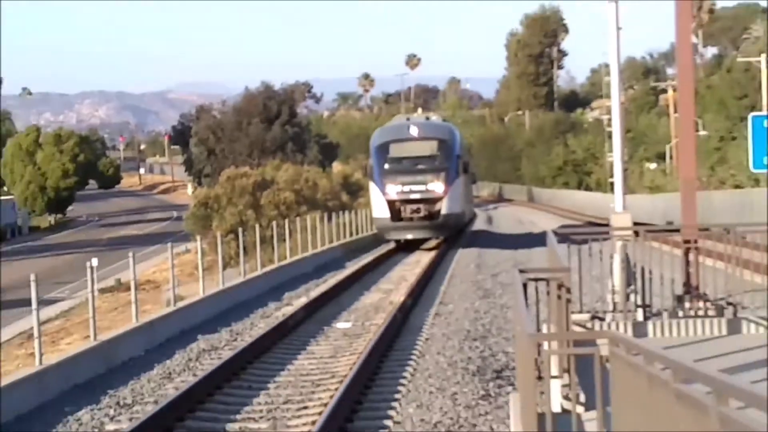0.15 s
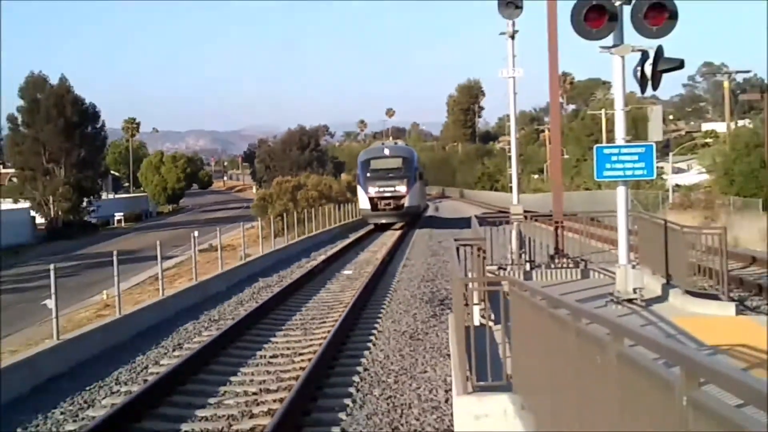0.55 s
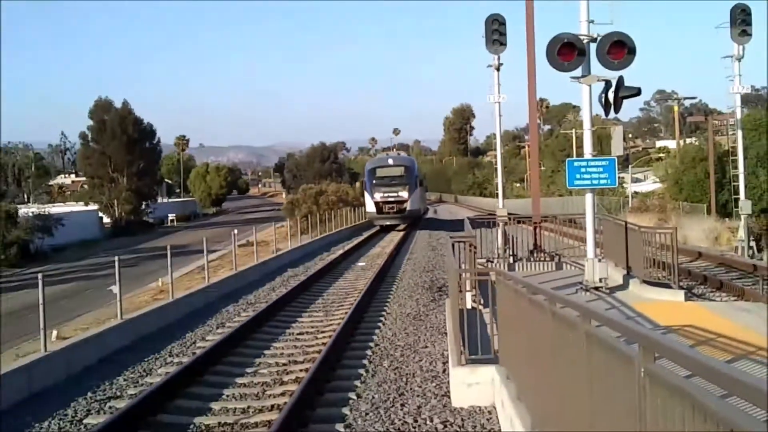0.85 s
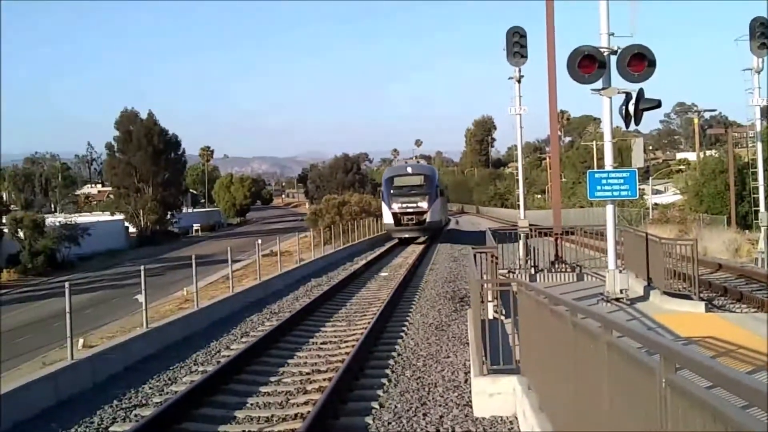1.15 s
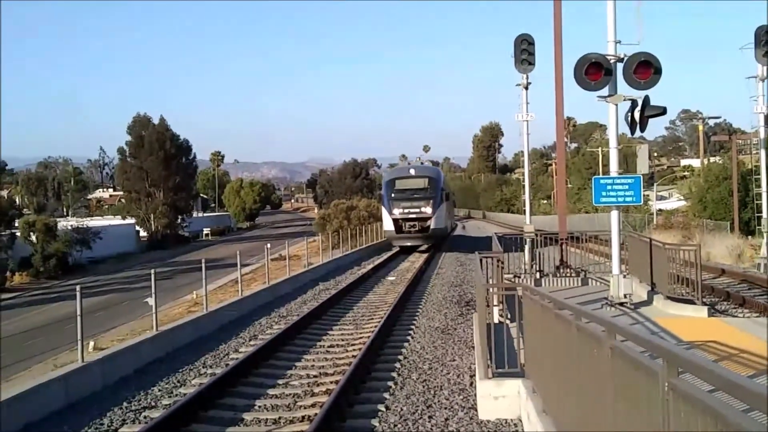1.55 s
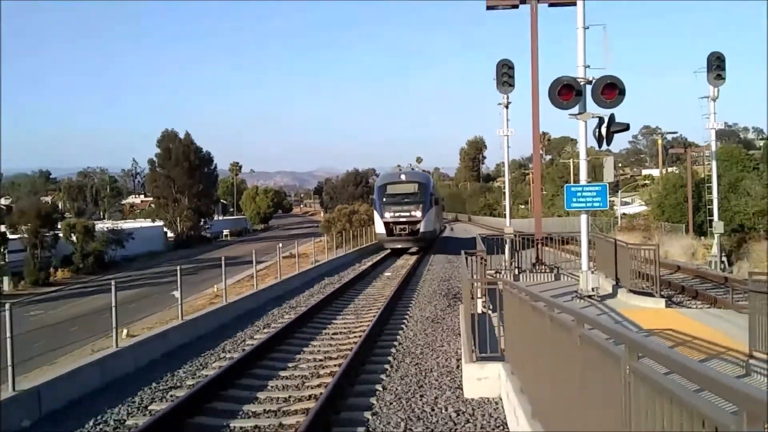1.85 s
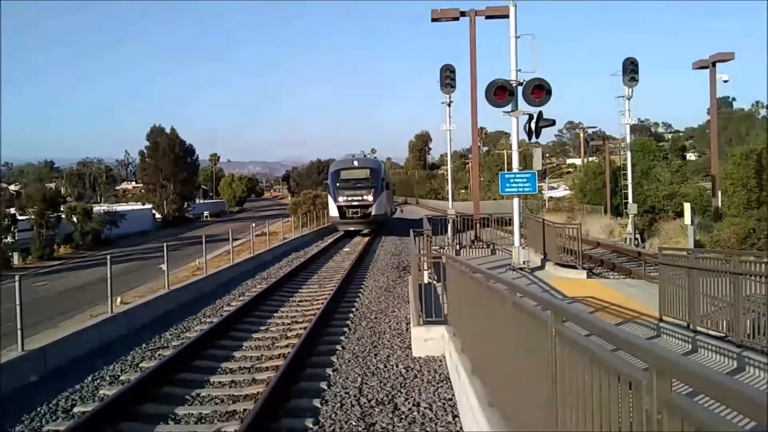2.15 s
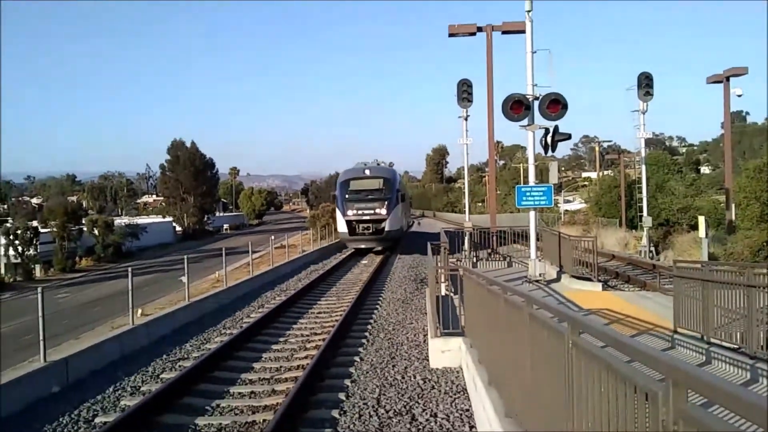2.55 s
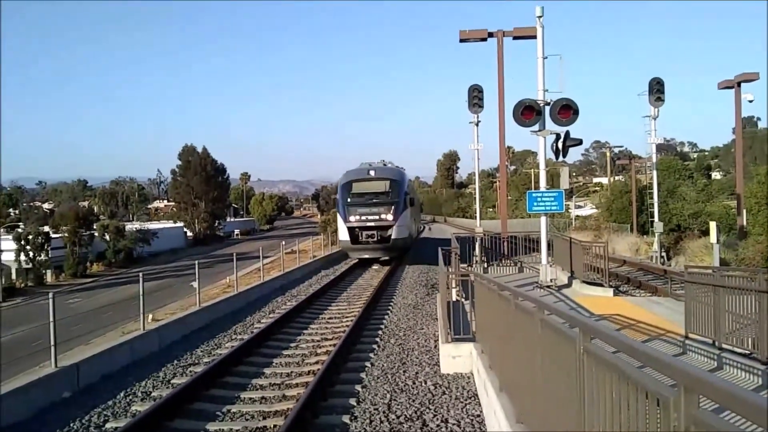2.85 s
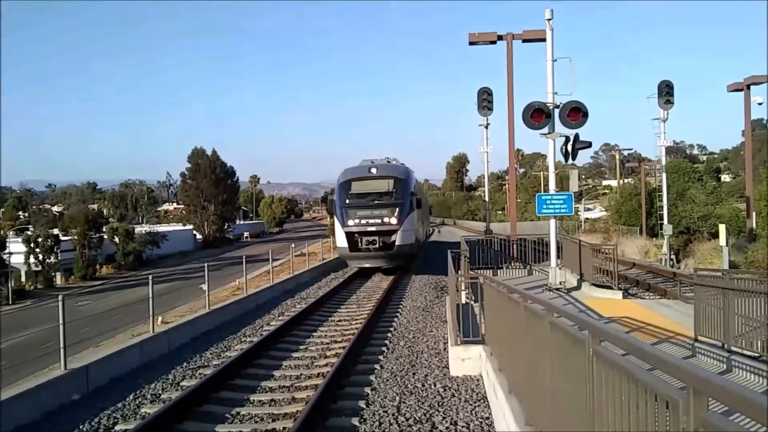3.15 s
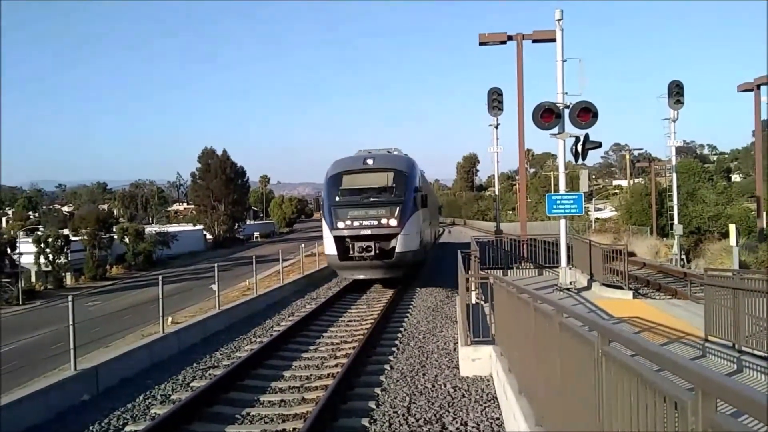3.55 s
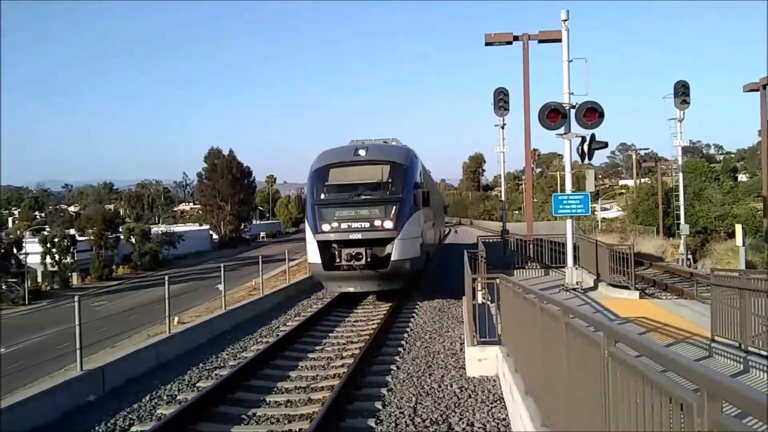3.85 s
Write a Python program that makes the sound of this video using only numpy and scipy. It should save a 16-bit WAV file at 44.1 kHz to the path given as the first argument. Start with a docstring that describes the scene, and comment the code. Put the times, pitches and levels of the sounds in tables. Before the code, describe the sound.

A train horn blows twice as a diesel railcar approaches, with wind buffeting the microphone.

```python
"""A diesel railcar rolls up to a platform crossing and blows its one-note air horn twice.
Its engine drones, air puffs, the wheels knock over rail joints, then the horn's diaphragm sounds,
brighter as the pressure rises. Heard from the crossing, with the town behind, on a handheld recorder:
wind buffets its two microphone ports, and its widener subtracts a delayed copy of each side from the
other."""
import sys
import numpy as np
from scipy import signal
from scipy.fft import rfft, irfft, next_fast_len
from scipy.io import wavfile
from scipy.ndimage import uniform_filter1d, minimum_filter1d

SR = 44100
rng = np.random.default_rng(int(sys.argv[2]) if len(sys.argv) > 2 else 0)


def output_pcm(signal):
    """Save a mono or channel-first signal as 16-bit PCM at the path in sys.argv[1].

    Samples are clipped to [-1, 1] before scaling.
    """
    pcm = np.clip(np.atleast_2d(signal).T, -1, 1) * 32767
    wavfile.write(sys.argv[1], SR, np.round(pcm).astype(np.int16))


N = 176400
TIME = np.arange(N) / SR


def amp(db):
    return 10 ** (np.asarray(db) / 20)


def unit_rms(x):
    return x / np.sqrt(np.mean(x ** 2) + 1e-20)


def in_time(rows):
    times, *columns = np.transpose(rows)
    return [np.interp(TIME, times, column) for column in columns]


def at_hz(rows, hz):
    freqs, values = np.transpose(rows)
    return np.interp(np.log(hz), np.log(freqs), values)


def lowpass(x, hz):
    return signal.sosfilt(signal.butter(1, hz, fs=SR, output="sos"), x)


def sides(pan_db):
    """Left and right gains; pan is left minus right."""
    return amp(np.array([pan_db / 2, -pan_db / 2])).reshape(2, -1)


def drift(hz):
    """Slow random wander, rms 1."""
    step = 40
    pole = np.exp(-2 * np.pi * hz * step / SR)
    slow = signal.lfilter([1], [1, -2 * pole, pole * pole], rng.standard_normal(N // step + 2002))[2000:]
    return np.interp(np.arange(N) / step, np.arange(len(slow)), unit_rms(slow))


def coloured(spectrum, likeness, flicker_db):
    """Stereo noise in octave bands that flicker on their own, the top ones less; rms 1."""
    hz = np.arange(N // 2 + 1) * SR / N + 1
    mid, side = rfft(rng.standard_normal((2, N)))
    alike = np.clip(at_hz(likeness, hz), -1, 1)
    white = np.sqrt(1 + alike) * mid + np.sqrt(1 - alike) * side * [[1], [-1]]
    shaped = white * amp(at_hz(spectrum, hz))
    octave = np.clip(np.log2(hz / 60), 0, 7)
    out = 0
    for k in range(8):
        band = irfft(shaped * np.clip(1 - abs(octave - k), 0, 1), N)
        out += amp(flicker_db * min(1, 2 - k / 4) * drift(12.5)) * band
    return unit_rms(out)


# The railcar drawing near the crossing: t/s, relative level/dB
ROLL_LEVEL = [(0, -60.5), (2.1, -63.5), (2.65, -57), (2.8, -47), (2.92, -42), (3.22, -41.5), (3.35, -44),
              (3.6, -44.5), (3.75, -39.5), (4, -42)]
# Its rolling noise: f/Hz, relative density/dB
ROLL_SPECTRUM = [(60, -39), (150, 9.5), (300, -2.5), (540, -8), (600, 6), (680, -3.5), (950, -15),
                 (1300, -25), (1750, -15), (2000, -11.5), (2200, -75), (2600, -13), (3300, -22.5),
                 (4300, -12.5), (5500, -19), (6500, -13), (7500, -21), (11000, -21.5), (14000, -37)]
# How alike the two ports hear railcar and town: f/Hz, correlation (-1..1)
PORT_LIKENESS = [(100, 1), (600, 0.63), (1500, -0.063), (2000, -0.78), (2600, -0.48), (3300, 0.57),
                 (5000, 0.011)]
RAILCAR_PAN_DB = -1


def rolling():
    """Wheels on rails, louder as they near; the left port is shaded from their treble."""
    noise = coloured(ROLL_SPECTRUM, PORT_LIKENESS, flicker_db=2.5)
    out = amp(8.5 + in_time(ROLL_LEVEL)[0]) * sides(RAILCAR_PAN_DB) * noise
    out[0] = lowpass(out[0], hz=9000)
    return out


# Background at the crossing: f/Hz, relative density/dB
TOWN_SPECTRUM = [(60, -75), (135, -57), (260, -62), (330, -60.5), (500, -76), (600, -60.5), (680, -71),
                 (950, -73.5), (1380, -73), (1750, -82.5), (2000, -72), (2200, -84), (3300, -89.5),
                 (4300, -92.5), (5250, -91.5), (5460, -78), (5700, -85.5), (6450, -88.5), (7500, -90.5),
                 (9000, -99), (11000, -101), (14000, -107)]


def town():
    """A steady wash of distant traffic and town, a little to the left."""
    return amp(-41.5) * sides(pan_db=5) * coloured(TOWN_SPECTRUM, PORT_LIKENESS, flicker_db=1.5)


# The diesel's drone: f/Hz, relative density/dB
ENGINE_SPECTRUM = [(80, -55.5), (99, -3.5), (107, -1), (117, -3), (150, -25.5), (195, -15.5), (211, -12),
                   (230, -21), (300, -39), (500, -88)]
# Its strength at the microphone: t/s, level/dB
ENGINE_LEVEL = [(0, -35.5), (1, -29), (1.6, -31.5), (2.5, -27), (3.1, -29.5), (4, -34)]


def engine():
    """Low diesel drone: noise in two humps an octave apart, the same at both ports."""
    return amp(in_time(ENGINE_LEVEL)[0]) * coloured(ENGINE_SPECTRUM, [(100, 1.0)], flicker_db=-1.0)


# Gusts right on the microphone: t/s, relative level/dB, pan/dB
PORT_GUSTS = [(0, -54.5, 21), (.21, -42, 6), (.35, -56, 0), (.55, -48.5, 12), (.65, -50.5, 16.5),
              (.95, -46.5, 14.5), (1.1, -51, 5), (1.4, -47, -1), (1.72, -42.5, 5), (1.9, -48, 2),
              (2.5, -46.5, 1), (2.75, -48, 9), (3.25, -40, -6), (3.4, -46, 1), (4, -57.5, -7.5)]
# Their rumble: f/Hz, relative density/dB
WIND_SPECTRUM = [(20, -9.5), (48, 1.5), (70, 7.5), (140, -0.5), (230, -9.5), (350, -17.5), (600, -28),
                 (1200, -84.5)]
# The deepest wind swells, then dies away: t/s, gain/dB
DEEP_SWELL = [(0.6, 0), (1.7, 5), (2.7, -3.5), (3.7, -9)]


def wind(lump_db=3.5, lump_hz=19.5):
    """Wind on the ports: lumpy low noise, mostly its own in each."""
    level_db, pan_db = in_time(PORT_GUSTS)
    lumps = amp(lump_db * np.array([drift(lump_hz), drift(lump_hz)]))
    noise = coloured(WIND_SPECTRUM, likeness=[(100, 0.2)], flicker_db=4.0)
    rumble = amp(18 + level_db) * sides(pan_db) * unit_rms(lumps * noise)
    deep = lowpass(rumble, hz=65)
    return rumble - deep + deep * amp(in_time(DEEP_SWELL)[0])


# Hard buffets on the ports: t/s, relative level/dB, f/Hz (higher is shorter)
PORT_BUFFETS = [(0.553, -8, 126), (0.743, -12.5, 140), (0.8, -10.5, 240), (.841, -8, 130),
                (0.856, -8.5, 207), (.899, -9, 263), (.905, -4.5, 300), (.913, -9, 300), (0.973, -3.5, 255),
                (.986, -7.5, 147), (1.482, -15.5, 138), (2.117, -13, 110), (2.278, -11, 175),
                (2.435, -13, 255), (2.519, -11, 230), (2.544, -15.5, 200)]


def buffets(width_cycles=0.48, edge_s=0.0008, lopsided=0.53, lee_db=-51):
    """Single pressure jolts, a push then a deeper dip, on the port that the gust favours."""
    _, pan_db = in_time(PORT_GUSTS)
    out = np.zeros((2, N))
    for at, db, hz in PORT_BUFFETS:
        cycles = (TIME - at) * hz
        pulse = np.exp(-(cycles / width_cycles) ** 2) * np.cos(np.pi * cycles)
        edge = np.tanh((TIME - at) / edge_s) + lopsided
        port_db = [[0], [lee_db]] if pan_db[int(at * SR)] > 0 else [[lee_db], [0]]
        out -= amp(db) * pulse * edge * amp(port_db)
    return out


# Faint puffs of air: t/s, length/s, level/dB
AIR_PUFFS = [(1.19, 0.022, -58), (2.255, 0.043, -49.5), (2.321, 0.078, -46.5), (2.416, 0.11, -52.5),
             (2.868, 0.023, -41)]


def puffs(band_hz=(3360, 8900)):
    """Air hissing in short, smooth humps."""
    humps = sum(amp(db) * np.exp(-(2 * (TIME - at) / length - 1) ** 2) for at, length, db in AIR_PUFFS)
    band = signal.butter(2, band_hz, "band", fs=SR, output="sos")
    return humps * unit_rms(signal.sosfilt(band, rng.standard_normal((2, N))))


# Ring of rail and car body: f/Hz, t60/s
RAIL_MODES = [(212, .12), (600, .05), (760, .04), (985, .02), (1290, .05)]
# Wheels meeting joints as the railcar comes close: t/s, level/dB, favoured f/Hz
JOINT_KNOCKS = [(2.408, -21.5, 212), (2.685, -28.5, 212), (2.822, -33.5, 600), (2.872, -38.5, 760),
                (2.891, -28.5, 985), (2.94, -38, 1290), (2.978, -26.5, 600), (2.999, -26.5, 600),
                (3.02, -29, 670), (3.059, -21, 860), (3.075, -31.5, 600), (3.119, -24, 637),
                (3.148, -31.5, 590), (3.18, -26.5, 647), (3.2, -40, 617)]


def wheel_knocks(loss_db_per_octave=51):
    """Soft blows at the joints: the modes near each blow's favoured pitch swell, then die."""
    times, db, favoured_hz = np.transpose(JOINT_KNOCKS)
    out = np.zeros(N)
    for hz, t60 in RAIL_MODES:
        strength = amp(db - loss_db_per_octave * abs(np.log2(hz / favoured_hz)))
        blows = np.zeros(N)
        blows[(times * SR).astype(int)] = strength * rng.choice([-1, 1], len(times))
        decay, angle = amp(-60 / (t60 * SR)), 2 * np.pi * hz / SR
        poles = [1, -2 * decay * np.cos(angle), decay * decay]
        ring = signal.lfilter([0, np.sin(angle)], poles, blows + 1e-18)
        # a second pass through the mode softens the attack
        out += signal.lfilter([0, 2 * np.e * (1 - decay) * np.sin(angle)], poles, ring)
    return out * sides(RAILCAR_PAN_DB)


# Two horn blasts at the crossing: t/s, f/Hz, relative level/dB, air pressure as brightness/dB
HORN_BLASTS = [(3.2, 368, -41, -68), (3.256, 367, -35, -58), (3.292, 366.2, -18, -33),
               (3.326, 367, -14, -9.5), (3.35, 364, -11.5, -3), (3.4, 365.7, -16, -6),
               (3.46, 364.5, -16, -14), (3.586, 366.8, -18.5, -21.5), (3.64, 365.2, -22, -36),
               (3.695, 366.5, -20.5, -31.5), (3.734, 366.5, -14.5, -8.5), (3.774, 365.3, -15, 0.5),
               (3.81, 363.7, -15, 0), (3.9, 366.4, -16, -10.5), (3.95, 366.7, -16, -8.5),
               (4.0, 365.7, -11.5, -4.5)]
# Harmonics 2 and up at full pressure: first blast level/dB, second blast level/dB, share of brightness
HORN_OVERTONES = [(-13.5, -18, 0.52), (-21, -19, 0.91), (-18, -21, 1.12), (-21, -31, 1.47), (-26, -30, 1.9),
                  (-32, -37, 2.7), (-22, -43.5, 3), (-20.5, -38, 2.46), (-35.5, -43, 1.85),
                  (-48, -51, 0.76), (-39, -36.5, 0.34), (-54, -42, 0.58), (-48, -43, 0.86),
                  (-54.5, -52.5, 0.25)]
# Their places between the ports: pan/dB, left lead/rad in the first blast, then both for the second
OVERTONE_IMAGE = [(0, -.2, 6, -.4), (5, .4, 5, 0), (-14, -.4, -9, -.3), (-1, -.2, 2, -1.9),
                  (4, -.1, 0, -.2), (-19, -2.6, -2, -3.1), (-4, -2.8, -5, -3.1), (-7, 2.2, -10, 1.8),
                  (6, .6, 6, .8), (6, .7, -6, .3), (-4, .2, -2, 0), (18, .3, 10, -1), (2, -1.9, 2, -1.5),
                  (-8, 1.6, -12, -1.5)]
# The fundamental's image wanders as the railcar moves: t/s, left lead/rad
FUNDAMENTAL_IMAGE = [(3.34, -0.59), (3.56, -0.91), (3.74, -.75), (3.8, -0.92), (3.96, -0.52)]


def horn(second_blast_s=3.66, breath_db=-28, breath_hz=34, waver_db=0.45):
    """A beating diaphragm: the main overtones grow faster than the fundamental as air pressure rises."""
    hz, level_db, bright_db = in_time(HORN_BLASTS)
    phase = 2 * np.pi * np.cumsum(hz) / SR
    to_second = np.clip((TIME - second_blast_s) / 0.054 + 0.5, 0, 1)

    def harmonic(k, db, pan_db, left_lead, ahead_rad=0):
        breath = amp(breath_db) * (drift(breath_hz) + 1j * drift(breath_hz))
        level = amp(db + waver_db * np.sqrt(k - 1) * drift(12.0))
        port_phase = k * phase + ahead_rad + left_lead * np.array([[0.5], [-0.5]])
        return sides(pan_db) * np.real(level * (1 + breath) * np.exp(1j * port_phase))

    # the bell sends its lowest tone out early
    out = harmonic(1, level_db + 6, pan_db=-0.5, left_lead=in_time(FUNDAMENTAL_IMAGE)[0], ahead_rad=1.05)
    for k, ((first_db, second_db, share), image) in enumerate(zip(HORN_OVERTONES, OVERTONE_IMAGE), 2):
        first, second = (first_db, *image[:2]), (second_db, *image[2:])
        db, pan_db, left_lead = (a + (b - a) * to_second for a, b in zip(first, second))
        out += harmonic(k, db + share * bright_db, pan_db, left_lead)
    return out * (TIME > HORN_BLASTS[0][0])


def scene():
    """Everything that reaches the two ports at the crossing."""
    return rolling() + town() + engine() + wind() + buffets() + puffs() + wheel_knocks() + horn()


def record(dry, cross_gain=0.83, lag_s=20 / SR, dull_hz=7100, ceiling=0.93, top_hz=14100):
    """The handheld: each side loses a late, dull copy of the other; peaks are limited, the top cut."""
    size = next_fast_len(N + 1000)
    hz = np.arange(size // 2 + 1) * SR / size
    cross = cross_gain * np.exp(-2j * np.pi * hz * lag_s) / (1 + (hz / dull_hz) ** 6)
    wide = dry - irfft(rfft(dry[::-1], size) * cross, size)[:, :N]
    safe_gain = np.minimum(1, ceiling / (abs(wide).max(axis=0) + 1e-9))
    limited = wide * uniform_filter1d(minimum_filter1d(safe_gain, size=1200), size=600)
    return signal.sosfilt(signal.ellip(12, 0.5, 70, top_hz, fs=SR, output="sos"), limited)


dry = scene()
out = record(dry)
output_pcm(out)
```